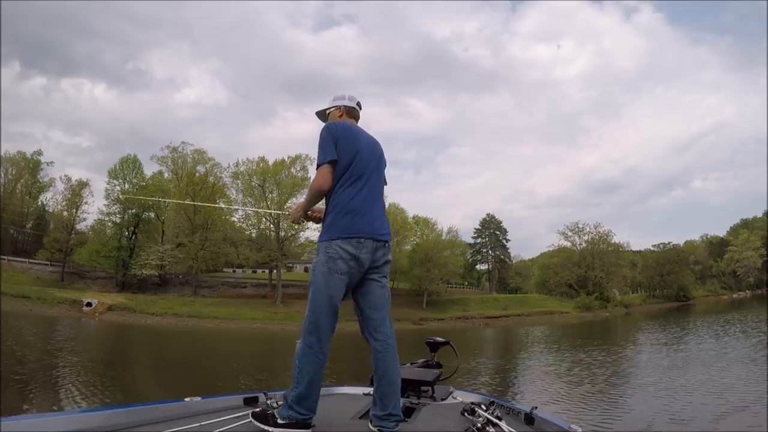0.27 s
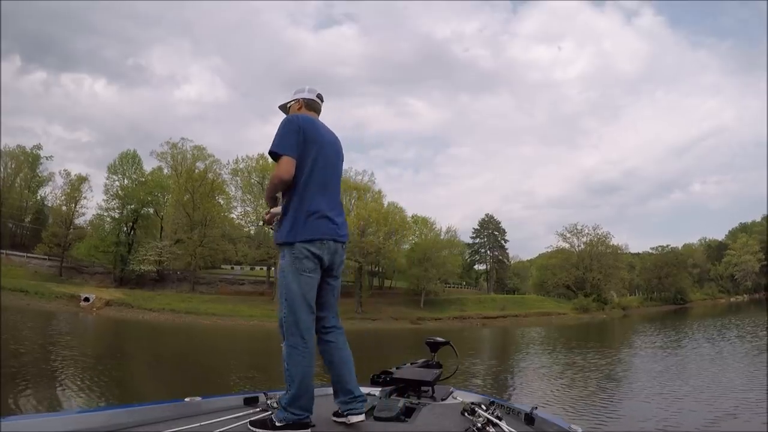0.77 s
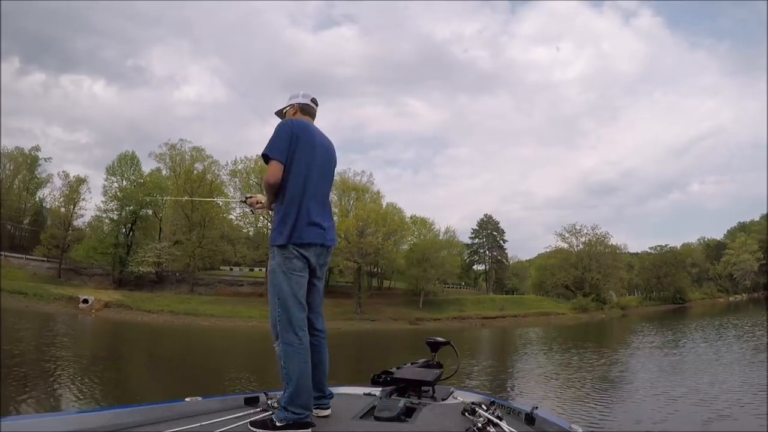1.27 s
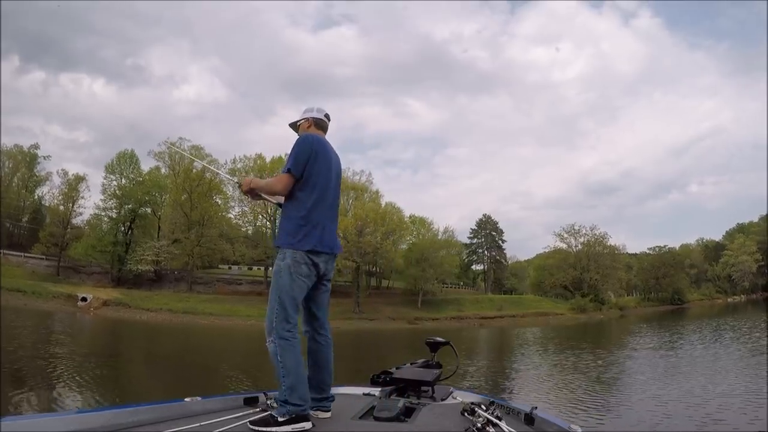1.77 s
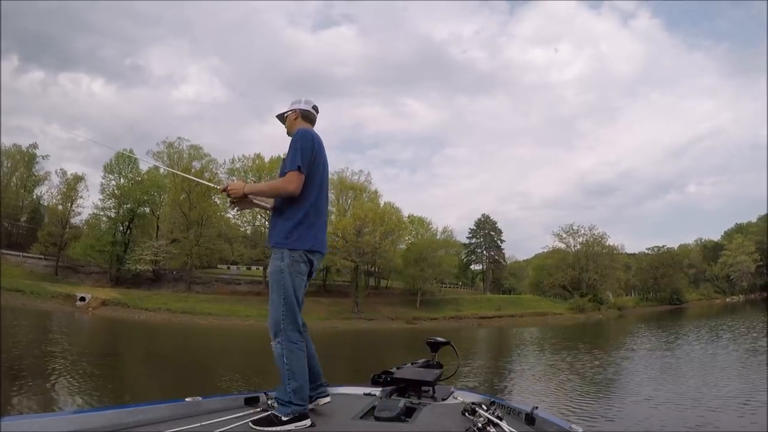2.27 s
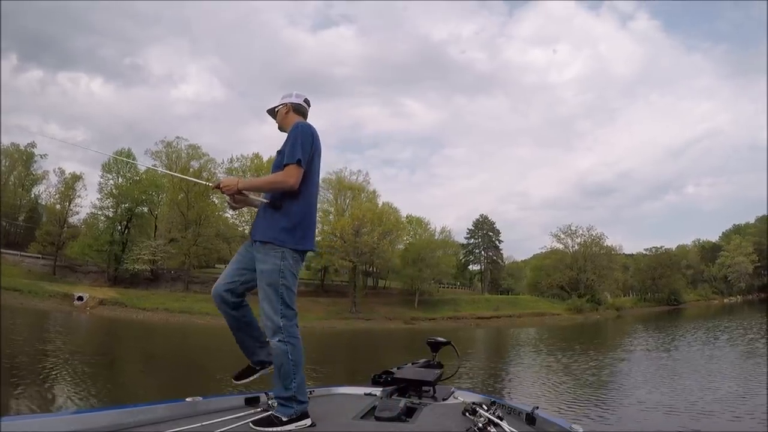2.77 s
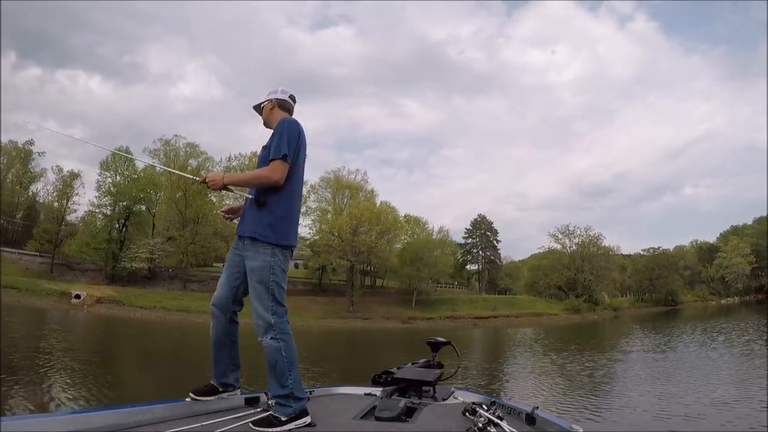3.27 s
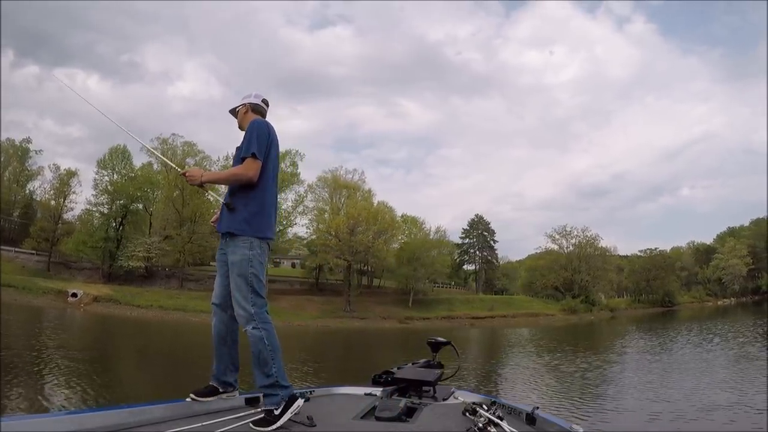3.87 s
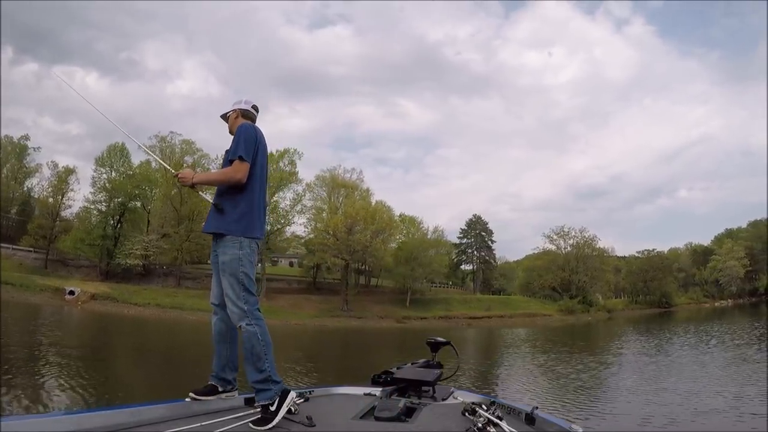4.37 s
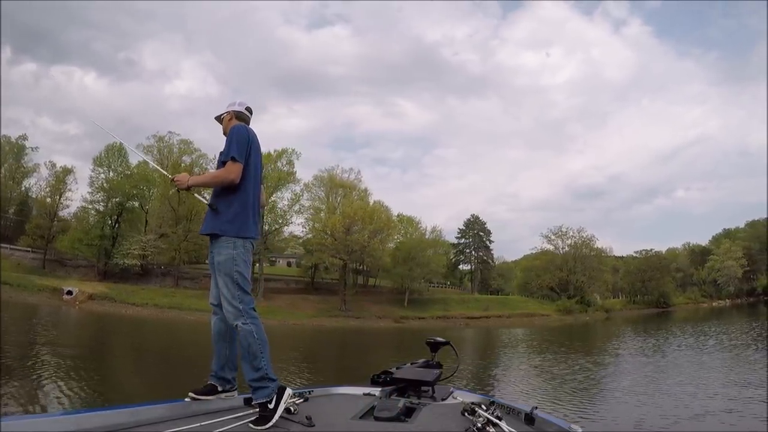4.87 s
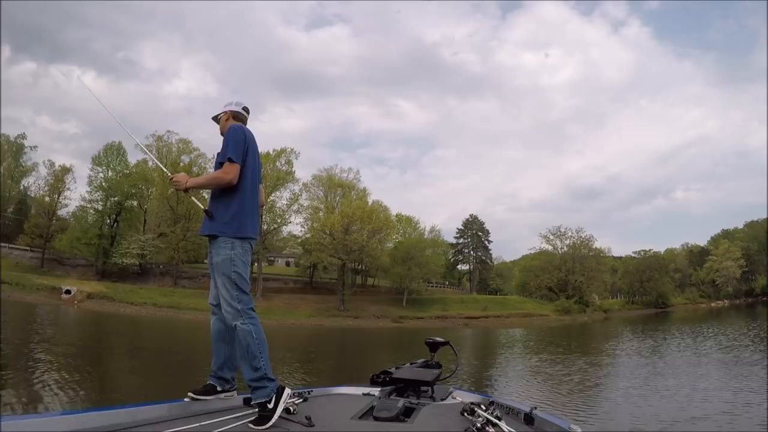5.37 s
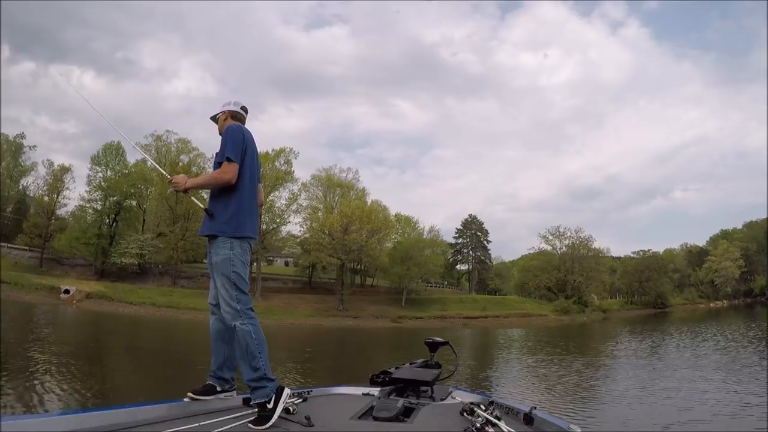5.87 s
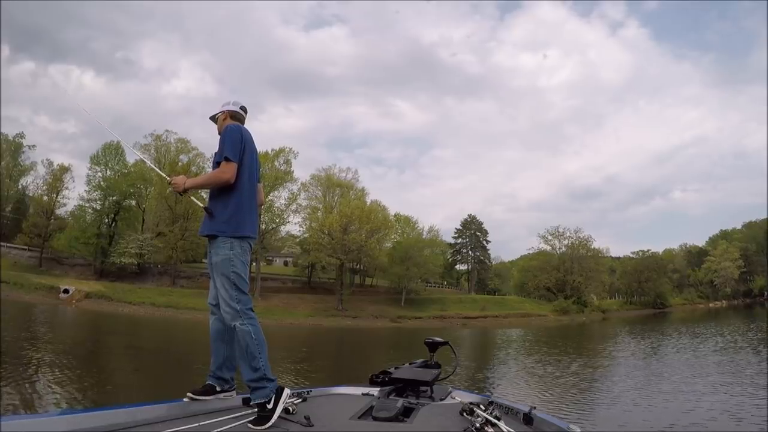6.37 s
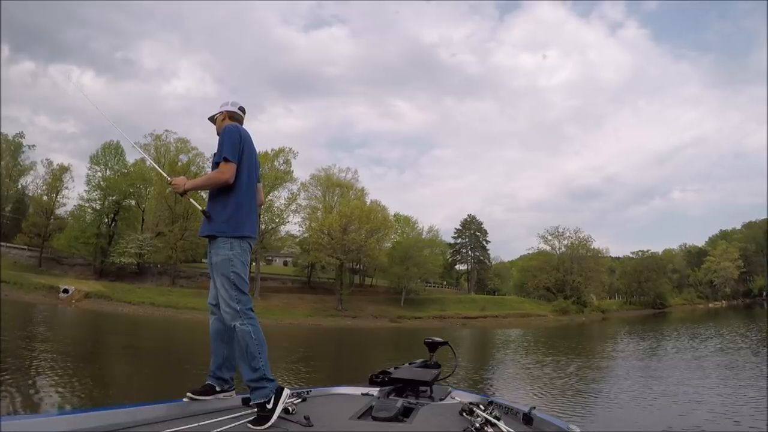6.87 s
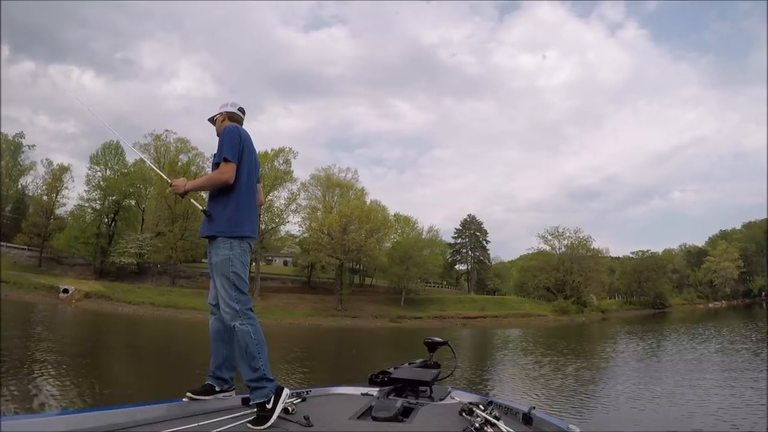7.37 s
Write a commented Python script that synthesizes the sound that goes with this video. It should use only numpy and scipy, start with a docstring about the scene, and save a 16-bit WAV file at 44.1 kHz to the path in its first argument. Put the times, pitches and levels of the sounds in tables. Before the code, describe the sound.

Low wind rumbles over a microphone on a quiet lake while many small birds chirp and trill, with a few reel clicks and deck knocks.

```python
"""Wind buffets the two ports of a small camera on a boat deck: shaped noise that swells with the gusts.
The hull rocks very low; a calm lake adds airy hiss and a far engine, as noise and a wavering sine.
Many songbirds whistle from the trees on shore: gliding sines with an echo tail of decaying noise.
A fishing reel clicks and feet knock the hollow deck: short pushes or rattles that ring dying sines."""
import sys
import numpy as np
from scipy import signal
from scipy.fft import rfft, irfft
from scipy.io import wavfile
from scipy.ndimage import uniform_filter1d

SR = 44100
rng = np.random.default_rng(int(sys.argv[2]) if len(sys.argv) > 2 else 0)


def amplitude_ratio(level_db):
    """Convert a level in decibels to the matching linear amplitude (field) ratio."""
    exponent = np.asarray(level_db, float) / 20
    return 10 ** exponent


def generate_wav(signal):
    """Clip the signal to [-1, 1] and save it as 16-bit WAV at the path in sys.argv[1]."""
    frames = np.transpose(np.atleast_2d(signal))
    scaled = np.clip(frames, -1, 1) * 32767
    pcm = np.round(scaled).astype(np.int16)
    wavfile.write(sys.argv[1], SR, pcm)


N = 336483  # length in samples

# how far the left port's wave runs ahead of the right's: pitch_hz, lead_radians
PORT_LEAD = [(2000, 0.5), (2800, -1), (3800, -0.8), (5000, 1), (7000, 3.5)]


def evened(x):
    """Scales a sound to an rms (average strength) of 1."""
    return x / np.sqrt(np.mean(x ** 2) + 1e-20)


def read(points, hz):
    """Reads a table of (Hz, value) at any pitch, along a log-frequency axis."""
    f, value = np.transpose(points)
    return np.interp(np.log(hz + 1), np.log(f + 1), value)


def add(mix, s, sound):
    """Mixes a sound in at s seconds, cutting off what runs past the end."""
    part = mix[..., round(s * SR):][..., :sound.shape[-1]]
    part += sound[..., :part.shape[-1]]


def ports(left_db):
    """Left and right gains of equal total power; left_db is left minus right."""
    left = amplitude_ratio(left_db)
    return np.array([left, np.ones_like(left)]) * np.sqrt(2 / (1 + left ** 2))


def noise(shape, patchy_db, size):
    """Two unrelated noises of one colour, with drifting loud and soft patches in time and pitch."""
    frames = N // (size // 4) + 5
    hz = np.fft.rfftfreq(size, 1 / SR)
    real, imaginary, patches = rng.standard_normal((3, 2, len(hz), frames))
    patches = uniform_filter1d(patches, size=5, axis=1)
    patches = evened(uniform_filter1d(patches, size=5, axis=2))
    level_db = read(shape, hz)[:, None] + patchy_db * patches
    spectrum = (real + 1j * imaginary) * amplitude_ratio(level_db)
    sound = signal.istft(spectrum, nperseg=size, noverlap=size * 3 // 4)[1]
    return evened(sound[:, :N])


def wind():
    """Eddies roll over the ports: a deep heave and a lumpier rumble, partly shared."""
    # gusts: time_s, gust_db, left_minus_right_db
    gusts = [(0, -47, 1), (.6, -48, -1.5), (1.2, -49.5, 1), (1.85, -57, 2), (2.3, -48, -2), (2.6, -37, -6),
             (2.95, -40.5, 2), (3.25, -34.5, -4.5), (3.9, -34, 0.5), (4.4, -38, 0.5), (5.0, -40.5, 0),
             (5.6, -47, 0), (6.3, -54.5, 2), (7.0, -62.5, 4), (7.63, -69, 6)]
    # colour of the deep heave: pitch_hz, level_db per Hz
    deep_colour = [(8, -17), (21, 6), (32, 1), (45, -1), (60, -17), (100, -30), (400, -120)]
    # colour of the upper rumble: pitch_hz, level_db per Hz
    rumble_colour = [(35, -16.5), (56, 1), (75, -6.5), (96, 0), (130, -7), (200, -34.5), (400, -55.5),
                     (2000, -120)]
    # how alike the two ports hear the wind: pitch_hz, likeness (0 unrelated, 1 the same)
    likeness = [(25, 0), (50, .75), (75, .7), (95, .1), (140, .3)]
    s, *columns = np.transpose(gusts)
    gust_db, left_db = (np.interp(np.arange(N) / SR, s, c) for c in columns)
    # the rumble gains 0.085 dB more for each dB of gust above -45 dB
    rumble_db = 0.5 + 0.085 * (gust_db + 45)
    heave = amplitude_ratio(-5.5) * noise(deep_colour, 0.76, size=4096)
    rumble = amplitude_ratio(rumble_db) * noise(rumble_colour, 2.3, size=4096)
    left, other = rfft(amplitude_ratio(gust_db) * (heave + rumble))
    same = np.clip(read(likeness, np.fft.rfftfreq(N, 1 / SR)), -1, 1)
    right = same * left + np.sqrt(1 - same ** 2) * other
    return irfft([left, right], N) * ports(left_db)


def hull():
    """The hull rocks the camera mount: a very low sound that pushes one port as it pulls the other."""
    # strength of the rocking ahead of the port gains: time_s, level_db
    sway = [(.3, -56), (.6, -47.5), (1.5, -62), (2.1, -48.5), (2.8, -35.5), (3.15, -35), (3.6, -48),
            (5.0, -53.5), (5.8, -61)]
    # colour of the rocking: pitch_hz, level_db per Hz
    hull_colour = [(12, -18), (21, -0.5), (38, -6), (55, -23), (200, -120)]
    s, db = np.transpose(sway)
    strength = amplitude_ratio(np.interp(np.arange(N) / SR, s, db))
    rocking = strength * noise(hull_colour, 1.0, size=8192)[0]
    return np.outer([.55, -1.45], rocking)  # gains of the left and right port


def air():
    """Far traffic, leaves and water as one soft hiss, with a wavering engine note on the left."""
    # colour of the air that both ports share: pitch_hz, level_db per Hz
    shared_colour = [(35, -29), (60, -27), (96, -14), (125, -3), (164, 7), (227, -10), (274, -12.5),
                     (338, -18.5), (651, -24), (1200, -26), (1440, -28.5), (2050, -27.5), (2710, -30),
                     (8710, -34), (13900, -39.5), (16000, -88)]
    # colour of the air that the ports hear in opposition: pitch_hz, level_db per Hz
    opposed_colour = [(35, -52), (60, -18), (108, -40), (142, -7), (172, -1), (287, -13), (398, -15.5),
                      (991, -17.5), (3500, -36), (7750, -33), (12400, -39), (16000, -52)]
    # balance of the hiss: pitch_hz, left_minus_right_db
    air_lean = [(60, -3), (180, 3), (550, -0.5), (1650, 0), (4970, 1), (15000, -7.5)]
    # far engine ahead of the port gains: time_s, pitch_hz, level_db
    drone = [(5.9, 214.6, -71), (6.5, 225.2, -53.5), (7.1, 221, -54.5), (7.63, 229.3, -64.5)]
    mid = amplitude_ratio(-49) * noise(shared_colour, 0.81, size=1024)[0]
    side = amplitude_ratio(-52) * noise(opposed_colour, 1.1, size=1024)[0]
    lean = ports(read(air_lean, np.fft.rfftfreq(N, 1 / SR)))
    hiss = irfft(rfft([mid + side, mid - side]) * lean, N)

    s, hz, db = np.transpose(drone)
    t = np.arange(N) / SR
    # the pitch wanders by about 1.2 percent
    waver = 1 + 0.01167 * evened(uniform_filter1d(rng.standard_normal(N), size=4000))
    turn = 2 * np.pi * np.cumsum(np.interp(t, s, hz) * waver) / SR
    engine = amplitude_ratio(np.interp(t, s, db, left=-120)) * np.sin(turn)
    return hiss + np.outer([2.4, .3], engine)  # gains of the left and right port


def sing(mix, s, hz, db, left_db, flutter_hz):
    """Adds a gliding, slightly unsteady sine; birds on the left reach the left port out of step."""
    flutter = evened(uniform_filter1d(rng.standard_normal((2, 4000)), size=120))
    flutter = flutter[:, np.arange(len(hz)) % 4000]
    turn = 2 * np.pi * np.cumsum(hz + flutter_hz * flutter[0]) / SR
    lead = read(PORT_LEAD, hz) * np.clip(0.6 + left_db / 8, 0, 1)
    unsteady_db = db + 0.069 * flutter_hz * flutter[1]
    add(mix, s, amplitude_ratio(unsteady_db) * ports(left_db) * np.sin([turn + lead, turn]))


def sing_note(mix, s, length, start_hz, end_hz, db, left_db, flutter_hz):
    """Sings one straight glide, carried on by 12 percent at each end for a soft rise and fall."""
    u = np.linspace(-.12, 1.12, round(1.24 * length * SR))
    swell_db = 20 * np.log10(signal.windows.tukey(len(u), .6) + 1e-4)
    hz = start_hz + (end_hz - start_hz) * u
    sing(mix, max(s - .12 * length, 0), hz, db + swell_db, left_db + 0 * u, flutter_hz)


def far_notes(count, start, end, low_hz, high_hz, glide, db):
    """Faint notes of distant birds at chance times and pitches; longer ones lean further left."""
    when, pitch, size, bend, louder = rng.random((count, 5)).T
    s = start + (end - start) * when
    hz = low_hz * (high_hz / low_hz) ** pitch
    end_hz = hz * (1 + glide * (bend - .3))
    return list(zip(s, .015 + .03 * size, hz, end_hz, db + 5 * louder, 14 * size - 5))


def single_notes(mix):
    """Sings the notes heard once and a scatter of far notes, all as short gliding sines."""
    # notes heard once: start_s, length_s, start_hz, end_hz, level_db
    notes_once = [(0.0, 0.0093, 4110, 4100, -55.5), (0.922, 0.033, 2103, 2064, -62.5),
                  (1.171, 0.045, 3630, 3610, -57), (1.015, .035, 5000, 5300, -60),
                  (1.26, 0.039, 2400, 3200, -62), (1.309, 0.11, 5900, 6100, -67),
                  (1.662, .1, 4750, 4580, -64.5), (1.68, 0.049, 4260, 4040, -66),
                  (2.282, 0.055, 3040, 2850, -64), (2.079, 0.0303, 1950, 2000, -65),
                  (2.249, .035, 2050, 2070, -64), (2.928, .08, 5100, 6100, -67),
                  (3.34, 0.088, 3190, 3190, -63), (4.21, 0.039, 5600, 5440, -61),
                  (3.263, .06, 5170, 4670, -62), (4.407, 0.14, 3560, 4930, -60.5),
                  (5.01, .069, 2900, 3300, -60), (5.201, 0.029, 2740, 2720, -60),
                  (5.917, 0.037, 3420, 3270, -59.5), (6.765, 0.036, 3650, 4220, -63),
                  (7.36, .046, 3680, 3680, -59), (7.414, .041, 1900, 2094, -63),
                  (7.527, 0.037, 2590, 2530, -61)]
    notes = [(*note, 3) for note in notes_once]  # 3 dB louder on the left
    notes += far_notes(count=70, start=0, end=7.5, low_hz=1800, high_hz=2985, glide=0.298, db=-70.0)
    notes += far_notes(count=70, start=2.7, end=4.7, low_hz=5000, high_hz=7500, glide=-.7, db=-69.5)
    notes += far_notes(count=40, start=0, end=7.5, low_hz=3200, high_hz=6600, glide=-.1, db=-71)
    notes += far_notes(count=90, start=3.6, end=6.6, low_hz=1900, high_hz=2900, glide=.25, db=-69.5)
    for note in notes:
        sing_note(mix, *note, flutter_hz=50.0)


def bout(first, last, pace, *db):
    """Nearly even repeats (s, dB) from first to last, the level passing through three values."""
    s = np.linspace(first, last, round((last - first) / pace) + 1)
    late, louder = rng.standard_normal((len(s), 2)).T
    level_db = np.interp(s, [first, (first + last) / 2, last], db)
    return zip(s + .003 * late, level_db + 1.5 * louder)  # no two repeats are quite alike


def phrases(mix):
    """Repeats short groups of gliding notes, some at an even pace and some at uneven moments."""
    # notes of each phrase, timed from its start, levels relative to the phrase:
    # start_s, length_s, start_hz, end_hz, level_db, left_minus_right_db
    phrase_notes = { "rise and hold": [(0, 0.0201, 2107, 2540, 2, -5), (.02, 0.0148, 2540, 3100, 0, -2),
                    (.035, 0.01605, 3130, 3170, 0, -5)],
                    "rise and flick": [(0, 0.0268, 1988, 2424, 0.5, -7), (.027, .014, 2600, 3200, 0, -6)],
                    "lower rise and flick": [(0, 0.0303, 1938, 2410, 2, -6),
                    (.03, 0.0122, 2504, 2810, -4.5, -7)],
                    "low slur": [(0.00041, .05, 1750, 2120, -0.5, -4)],
                    "answering slur": [(0, .049, 1970, 2270, 0, -9)],
                    "falling trill": [(0, 0.019, 5130, 4980, 0, 6), (.014, 0.011, 5000, 3670, -2.5, 5),
                    (.038, .02, 2800, 2450, 0.5, -7)], "drop": [(0, 0.018, 4400, 3600, -0.5, 1)],
                    "peep": [(0, .015, 3550, 3350, 0.5, 0), (.024, .014, 3200, 3480, -1, -1)],
                    "four notes": [(0, 0.029, 2700, 3360, 2.5, 9), (.07, .015, 3730, 3050, 3.5, 11),
                    (.108, 0.027, 2550, 2695, -2.5, 16), (.14, .032, 3700, 4230, 4, 17)],
                    "plunge": [(0, 0.016, 7500, 5530, 3, 21), (.014, .028, 5500, 4280, -2, 3)],
                    "sharp chip": [(-.01, 0.014, 5770, 7130, -1.5, 0.5), (.002, .016, 7100, 8110, 2, -1)],
                    "sweep": [(0.0046, 0.053, 3000, 4200, -1, 1)],
                    "thin stutter": [(0, .007, 6420, 6900, -2, 18), (.013, .007, 6450, 7020, 1, 18),
                    (.026, .008, 6500, 6950, 0, 18)], "high hook": [(0, 0.02, 5250, 6430, 2.5, 18),
                    (.018, .06, 6440, 6470, -6.5, 15), (.07, .08, 6300, 4600, -13.5, 10)],
                    "low hook": [(0, .016, 5300, 6060, 4, 14), (.016, .03, 6020, 6120, 0.5, 16),
                    (.055, .07, 6100, 4500, -7, 12)], "arch": [(0, .015, 6650, 6180, 4.5, 18),
                    (.015, 0.037, 6200, 6600, 1, 18), (.055, .03, 6650, 6600, 0, 20),
                    (.085, .035, 6600, 6120, -6, 12)], "warble": [(0, .07, 4550, 4780, -1, 4)],
                    "low fall": [(0, .035, 2350, 1930, -3, 22)]}
    # even repeats: phrase, first_s, last_s, rough pace_s, first_db, middle_db, last_db
    bouts = [("four notes", .124, 0.97, .283, -56.5, -56.5, -59.5),
             ("peep", 1.78, 2.455, .0844, -60, -63, -63.5),
             ("rise and hold", 2.693, 4.837, .1533, -61, -61.5, -60.5),
             ("rise and flick", 3.233, 5.07, .1533, -62, -57, -54.5),
             ("low slur", 5.143, 5.31, .167, -63.5, -61, -60),
             ("lower rise and flick", 5.233, 6.357, .1606, -56, -55, -60),
             ("drop", 5.342, 6.64, .1622, -57, -67, -66),
             ("falling trill", 5.408, 5.976, .0947, -56.5, -56.5, -58.5),
             ("low slur", 6.247, 6.654, .2035, -58.5, -63, -60.5),
             ("answering slur", 6.514, 7.458, .236, -59, -62.5, -59.5),
             ("low slur", 6.884, 7.569, .228, -58.5, -62, -63),
             ("four notes", 6.911, 7.474, .2815, -55, -56.5, -54.5)]
    # phrases at uneven moments: phrase, list of (start_s, level_db)
    called = [("plunge", [(3.07, -60), (3.29, -57.5), (3.485, -57.5), (4.08, -58), (4.245, -61),
              (4.375, -64)]), ("sharp chip", [(4.473, -62), (5.466, -54.5), (5.998, -52), (6.931, -51.5)]),
              ("sweep", [(3.515, -58), (3.742, -58), (3.966, -58.5)]), ("thin stutter", [(.685, -58),
              (.899, -50.5), (1.16, -54), (1.255, -61)]), ("high hook", [(3.405, -57), (3.635, -50.5)]),
              ("low hook", [(3.012, -60), (3.868, -55.5), (4.468, -62)]), ("arch", [(5.855, -57),
              (6.245, -58)]), ("warble", [(.744, -58.5), (.972, -58), (1.235, -63.5), (3.665, -62)]),
              ("low fall", [(1.992, -61), (2.34, -55), (5.667, -52), (6.11, -54)])]
    songs = called + [(name, bout(*rule)) for name, *rule in bouts]
    for name, repeats in songs:
        for start, song_db in repeats:
            for s, length, start_hz, end_hz, db, left_db in phrase_notes[name]:
                sing_note(mix, start + s, length, start_hz, end_hz, db + song_db, left_db, flutter_hz=25.0)


def whistles(mix):
    """Sings long clear whistles whose pitch and level bend smoothly from point to point."""
    # one list of points for each whistle: time_s, pitch_hz, level_db, left_minus_right_db
    whistle_points = [
        [(.33, 1900, -65, 12), (.47, 2510, -65, 15), (.5, 2547, -74, 12), (.54, 2400, -67, 16),
         (.63, 1880, -69, 12), (.68, 2100, -68, 12.5)],
        [(0, 2050, -68, 15), (.08, 2020, -67, 14), (.13, 2420, -68, 12)],
        [(1.23, 2680, -72, 5), (1.27, 2626, -56, 7), (1.4, 2498, -60.5, 3), (1.56, 2490, -73, 3)],
        [(3.15, 3440, -66, -3), (3.2, 3630, -68, -5), (3.26, 4210, -56.5, 0), (3.285, 4170, -56, -3),
         (3.31, 3780, -68, -3)],
        [(4.94, 3010, -66, -10), (5.04, 3720, -62, -19), (5.1, 3920, -49.5, -10), (5.2, 4140, -55.5, -3),
         (5.24, 4110, -65, -10)],
    ]
    for rows in whistle_points:
        s, *columns = np.transpose(rows)
        t = np.arange(s[0], s[-1], 1 / SR)
        hz, db, left_db = (np.interp(t, s, c) for c in columns)
        sing(mix, s[0], uniform_filter1d(hz, size=900), db, left_db, flutter_hz=11.0)


def birds():
    """Single notes, repeated phrases and long whistles; the trees smear them with an echo tail."""
    song = np.zeros((2, N))
    single_notes(song)
    phrases(song)
    whistles(song)
    t = np.arange(SR) / SR
    # a quick decay and a slow one (seconds to fall 60 dB), starting after 4 ms
    fade = (amplitude_ratio(-60 * t / 0.11) + 0.44 * amplitude_ratio(-60 * t / 2.3)) * (t > .004)
    tail = rng.standard_normal((2, len(t))) * fade
    echo = signal.fftconvolve(song, tail / np.linalg.norm(tail[0]), axes=1)[:, :N]
    return song + amplitude_ratio(-4.5) * echo


def ring(modes, length=.4):
    """One dying sine for each (Hz, t60), t60 being the seconds it takes to fall 60 dB."""
    t = np.arange(round(length * SR)) / SR
    return np.array([amplitude_ratio(-60 * t / t60) * np.sin(2 * np.pi * hz * t) for hz, t60 in modes])


def scrape(length, low_hz, high_hz):
    """A dying burst of rough noise between two edges, partly shared by the ports."""
    t = np.arange(4000) / SR
    burst = rng.standard_normal((2, 4000)) + 0.47 * rng.standard_normal(4000)
    sos = signal.butter(2, [low_hz, high_hz], "band", fs=SR, output="sos")
    return signal.sosfilt(sos, burst * np.exp(-t / length))


def reel():
    """A short rattle of metal on metal cracks and rings the reel body."""
    # clicks: start_s, ringing peak_db ahead of the balance, low_modes_db, high_modes_db,
    # left_minus_right_db, rattle_s
    clicks = [(0.2887, -26, -19, 15.5, 11, 0.0086), (1.8437, -41, 7.5, 11, 12, 0.004),
              (1.9016, -46, 1, -6, -1, 0.0044), (2.5406, -41, -8, 1, 2.0, 0.008),
              (2.5614, -34, 5, 13, 18, 0.0018), (2.5656, -18.5, 4.5, 10.5, 4.5, 0.0067),
              (2.5734, -35, -3, 13, 11, 0.017), (2.5844, -27.5, 7, 7, 1, 0.0049),
              (3.0674, -43.5, 10, 3, -24, 0.0038), (3.3104, -45, 6, 18, 4, 0.012)]
    # ringing modes of the reel body: pitch_hz, level_db, t60_s
    reel_modes = [(836, -3.5, 0.03), (1610, 0.5, 0.027), (2130, -1, 0.016), (3300, -6.5, 0.037),
                  (3980, 7.5, 0.0055), (4950, -7, 0.0039), (6300, 2, 0.007), (7060, -4.5, 0.0081),
                  (8700, -25, 0.0031), (10200, -48, 0.0016), (14000, -34, .003)]
    out = np.zeros((2, N))
    hz, mode_db, t60 = np.transpose(reel_modes)
    modes = ring(zip(hz, t60), .15)
    t = np.arange(2000) / SR
    # the ports oppose each other low down
    signs = np.where(hz < 1400, -1, np.cos(read(PORT_LEAD, hz)))
    for s, db, low_db, high_db, left_db, rattle in clicks:
        colour_db = mode_db + np.interp(hz, [2200, 3500, 5500], [low_db, 0, high_db])
        rub = rng.standard_normal((len(hz), 2000)) * np.exp(-t / max(rattle, 2e-4) * 3)
        body = signal.fftconvolve(rub, amplitude_ratio(colour_db)[:, None] * modes, axes=1)
        left = body.sum(0)
        right = signs @ body + .5 * np.roll(left, 37)  # plus a half-strength copy 37 samples later
        pair = np.array([left, right])
        add(out, s, amplitude_ratio(db) * pair / abs(pair.mean(0)).max() * ports(left_db)[:, None])
        add(out, s, amplitude_ratio(db - 7.5) * scrape(1.15 * rattle, 1840.0, 7300.0))
        # the right port is brighter
        add(out[1], s, amplitude_ratio(db - 15) * scrape(1.4 * rattle, 7800.0, 8000.0)[0])
    return out


def deck():
    """Soft pushes and a rolling weight ring the deck, which shakes the camera mount."""
    # steps: start_s, push level_db at 257 Hz, hardness_db per octave, decay_s of the push
    steps = [(1.912, -38.5, -5.5, 0.012), (2.549, -35.5, -13, 0.026), (3.06, -38, -3, 0.0062),
             (3.091, -43.5, -2, 0.0045), (3.309, -32, 3, 0.0022), (3.326, -25, -8, 0.0046)]
    # ringing modes of the hollow deck: pitch_hz, level_db alike at both ports,
    # level_db in opposition, t60_s
    deck_modes = [(104, -21, -11, 0.12), (164, -21, 3, 0.19), (264.4, -11.5, 6.5, 0.22),
                  (394, -1.5, -6, 0.044), (490, -12, 2, 0.052), (666, -13.5, 0, 0.047),
                  (903, -5, -23, 0.045), (1078, -12, -12, 0.037), (1900, -29, -22, .015)]
    # weight rolling over the deck: time_s, level_db of its push at 160 Hz
    shift = [(2.1, -93), (2.3, -78.5), (2.5, -69), (2.65, -95)]
    hz, mid_db, side_db, t60 = np.transpose(deck_modes)
    modes = ring(zip(hz, t60))
    scuffs = np.zeros((2, N))
    drive = np.zeros((len(hz), N))  # the push on each mode
    t = np.arange(2000) / SR
    for s, db, hard_db, length in steps:
        uneven = 1 + .2 * rng.standard_normal((len(hz), 1))
        push = uneven * np.exp(-t / length) * np.cos(2 * np.pi * hz[:, None] * t)
        strength = amplitude_ratio(db + hard_db * np.log2(hz / 257))[:, None]
        add(drive, s, 2 * push / (length * SR) * strength)
        # the sole scuffs the carpet
        add(scuffs, s, amplitude_ratio(db + 0.99 * hard_db - 5) * scrape(0.014, 270.0, 2150.0))

    s, db = np.transpose(shift)
    roll_db = np.interp(np.arange(N) / SR, s, db, left=-120, right=-120)
    roll = amplitude_ratio(roll_db) * rng.standard_normal(N)
    drive += np.outer(amplitude_ratio(-9 * abs(np.log2(hz / 160))), roll)  # 9 dB weaker per octave from 160 Hz
    rung = signal.oaconvolve(drive, modes, axes=1)[:, :N]
    mid, side = amplitude_ratio(mid_db) @ rung, amplitude_ratio(side_db) @ rung
    return scuffs + np.array([mid + side, mid - side])


def scene():
    """All sources at the two ports."""
    return wind() + hull() + air() + birds() + reel() + deck()


def low_pass(x):
    """Removes everything above the highest recorded frequency."""
    return signal.sosfilt(signal.butter(12, 16360, fs=SR, output="sos"), x)


def record(dry):
    """The ports dull the top treble of the mix."""
    # response of the ports: pitch_hz, level_db
    port_treble = [(10300, 0.5), (11300, -7.5), (14500, -7.5), (15600, -15)]
    response_db = read(port_treble, np.fft.rfftfreq(N, 1 / SR))
    heard = irfft(rfft(dry) * amplitude_ratio(response_db), N)
    return low_pass(heard)


dry = scene()
out = record(dry)
generate_wav(out)
```